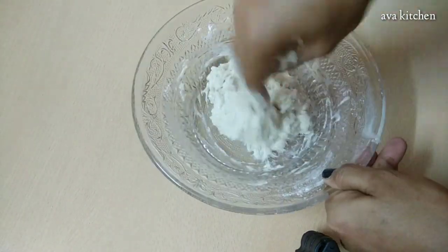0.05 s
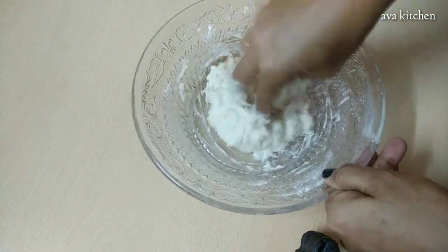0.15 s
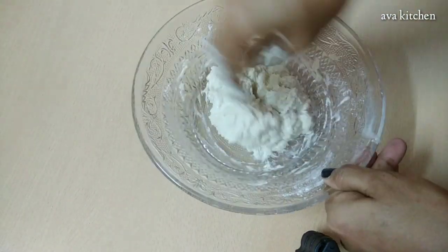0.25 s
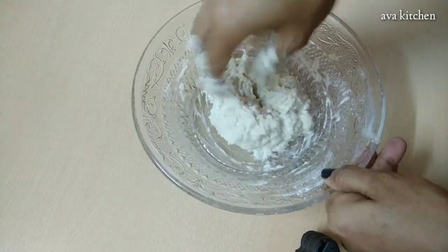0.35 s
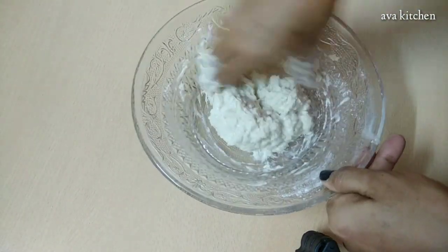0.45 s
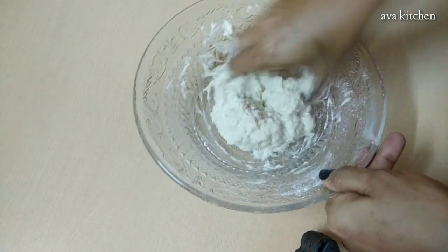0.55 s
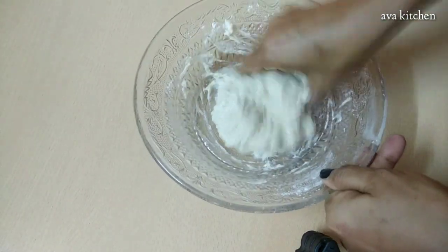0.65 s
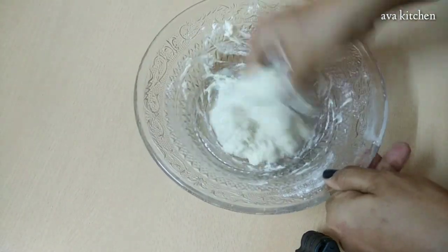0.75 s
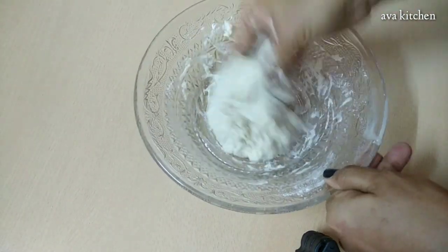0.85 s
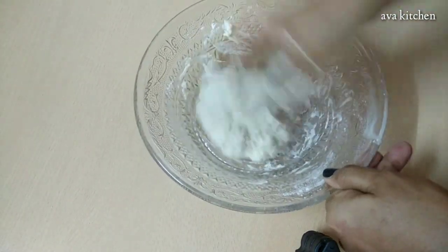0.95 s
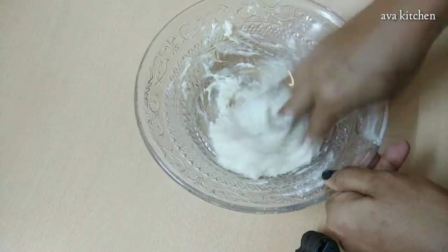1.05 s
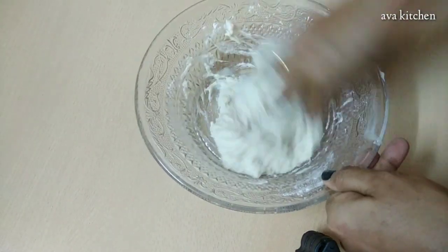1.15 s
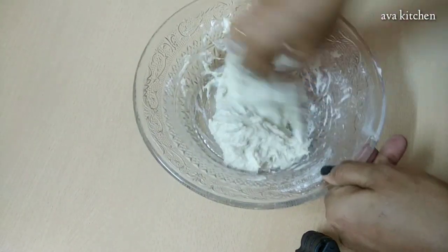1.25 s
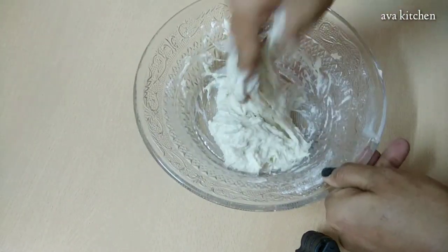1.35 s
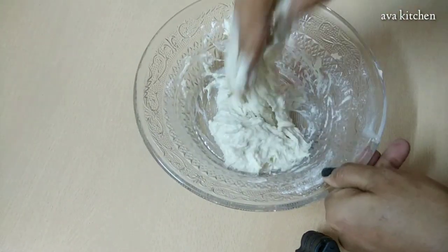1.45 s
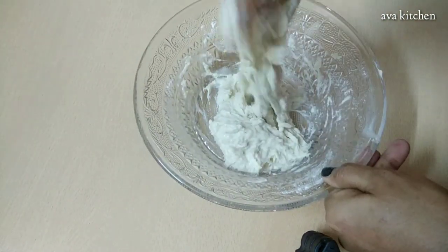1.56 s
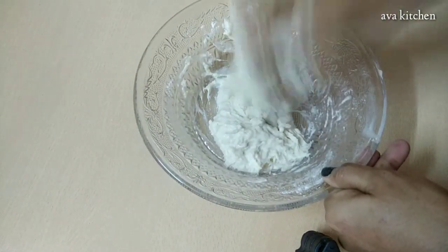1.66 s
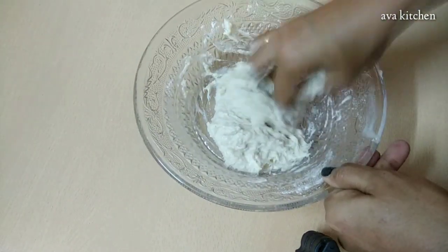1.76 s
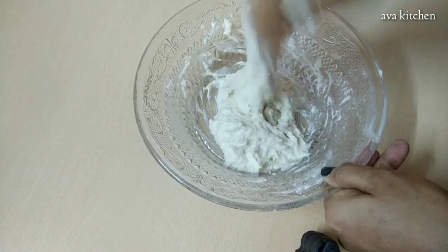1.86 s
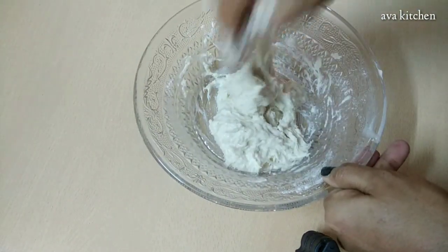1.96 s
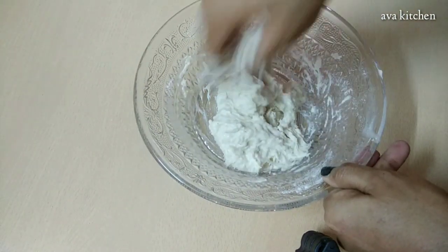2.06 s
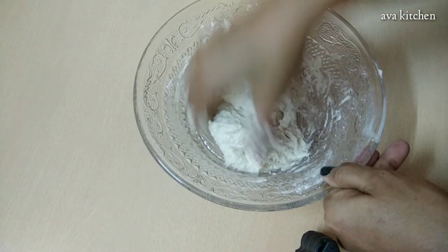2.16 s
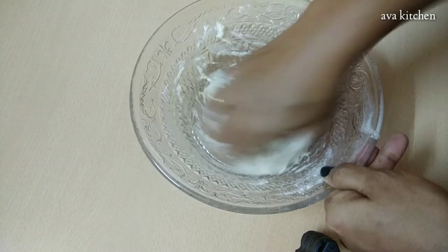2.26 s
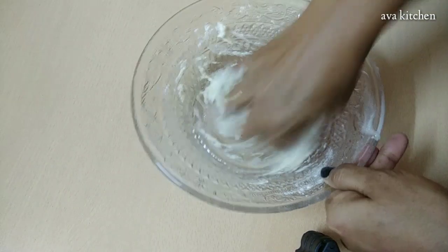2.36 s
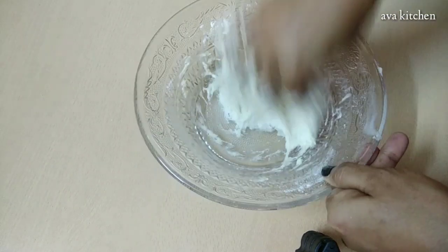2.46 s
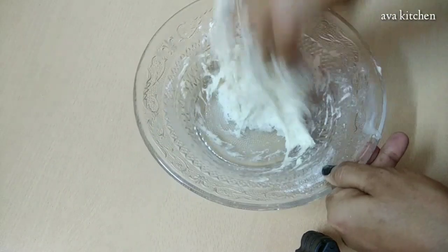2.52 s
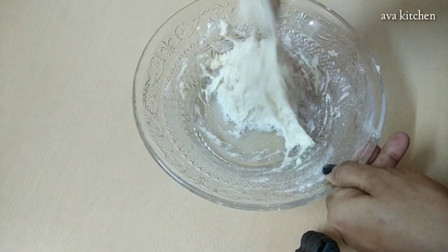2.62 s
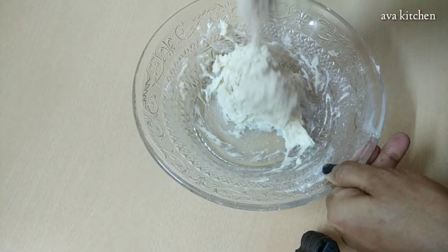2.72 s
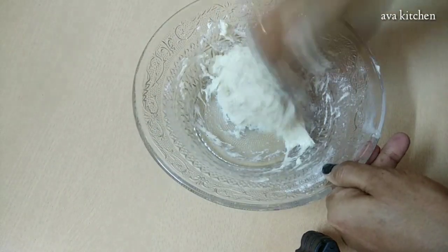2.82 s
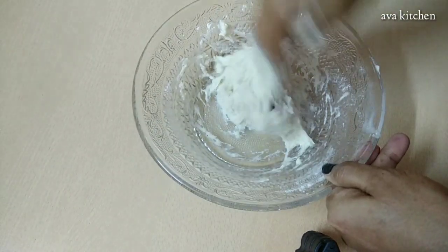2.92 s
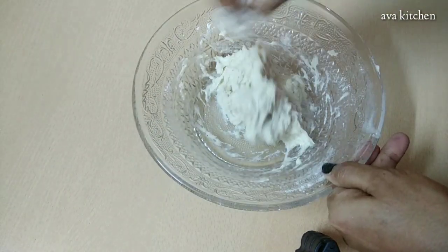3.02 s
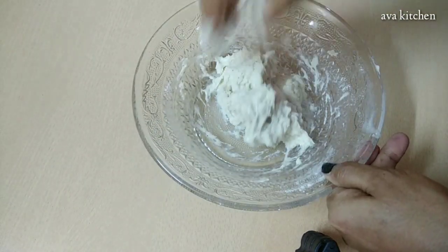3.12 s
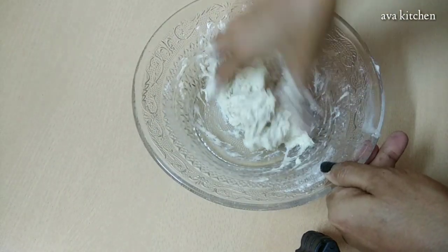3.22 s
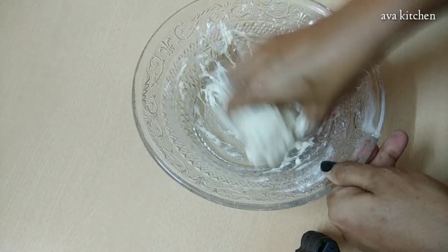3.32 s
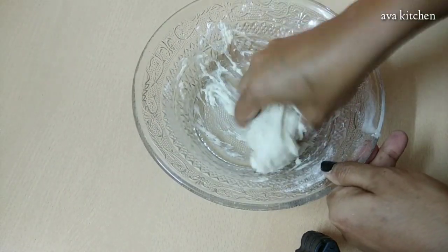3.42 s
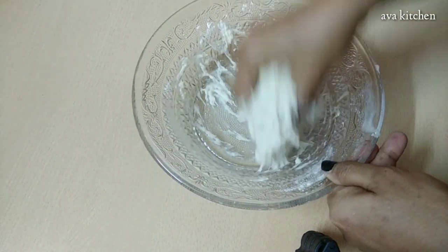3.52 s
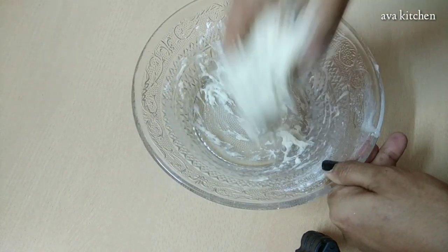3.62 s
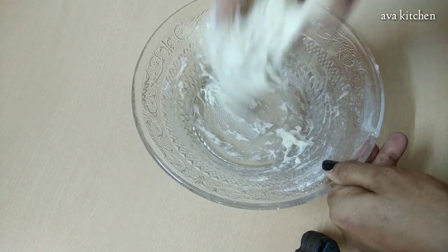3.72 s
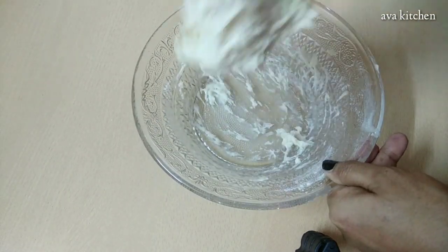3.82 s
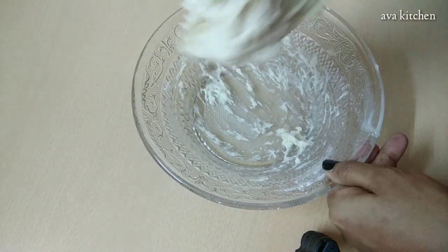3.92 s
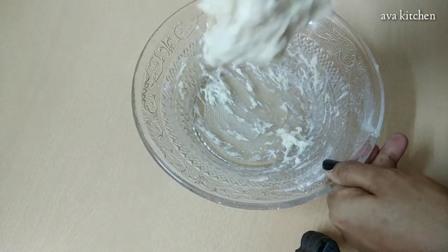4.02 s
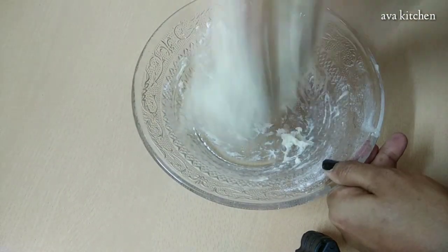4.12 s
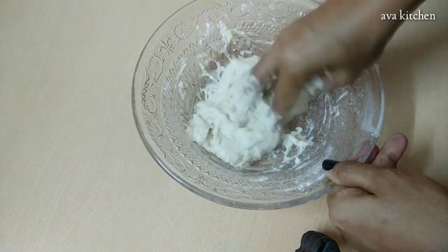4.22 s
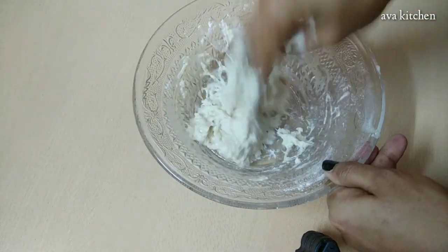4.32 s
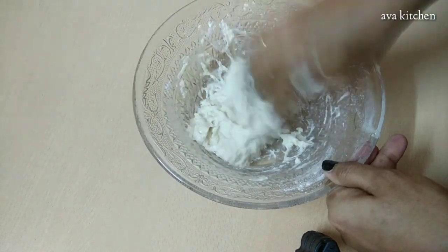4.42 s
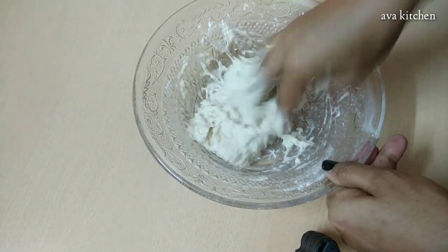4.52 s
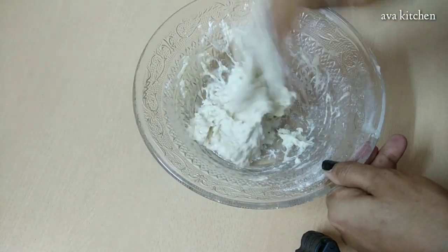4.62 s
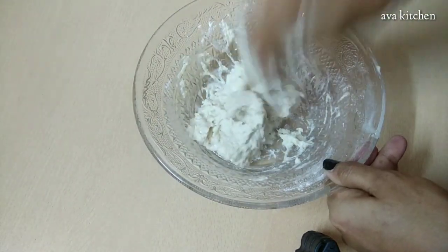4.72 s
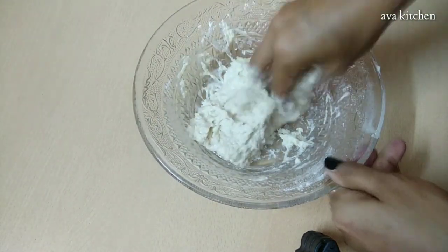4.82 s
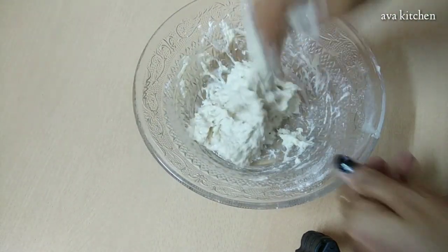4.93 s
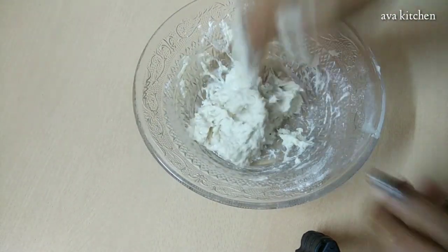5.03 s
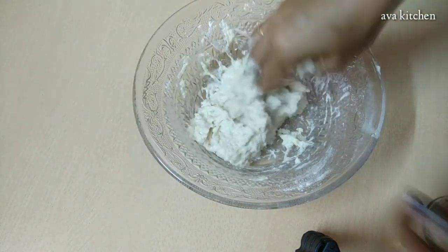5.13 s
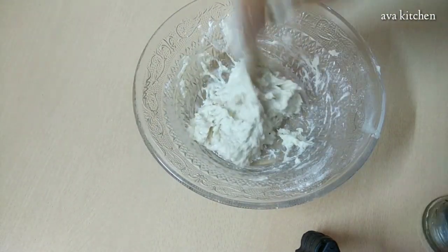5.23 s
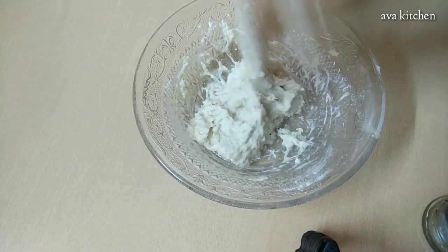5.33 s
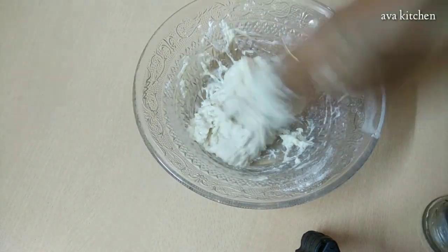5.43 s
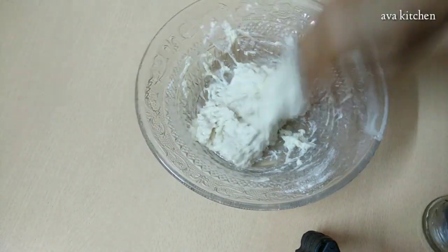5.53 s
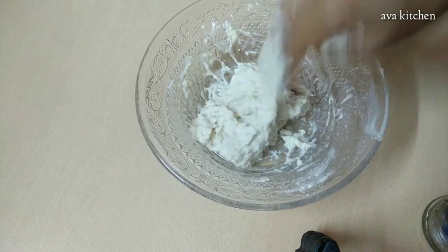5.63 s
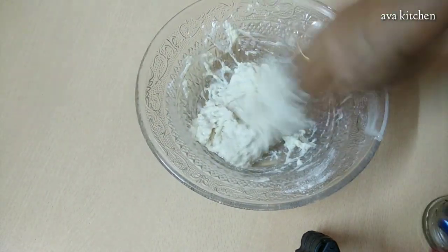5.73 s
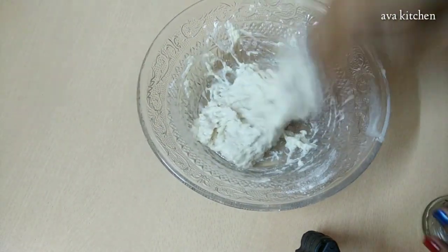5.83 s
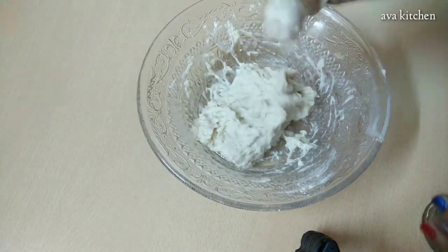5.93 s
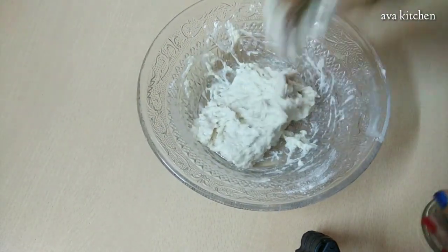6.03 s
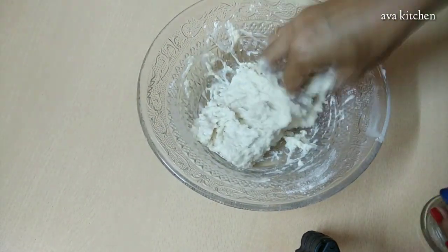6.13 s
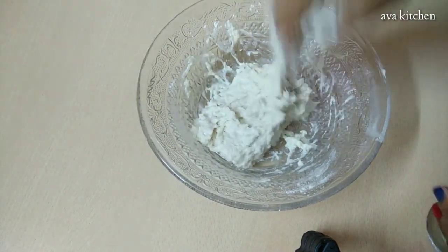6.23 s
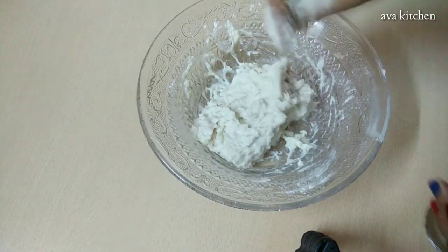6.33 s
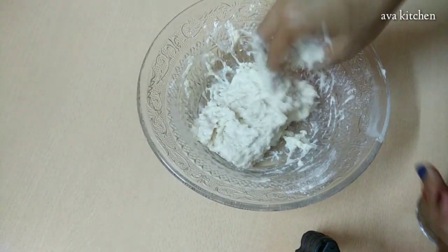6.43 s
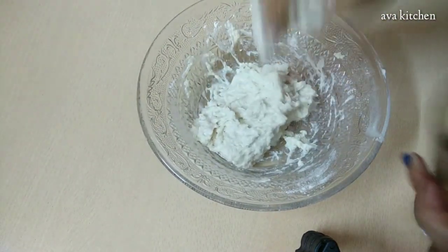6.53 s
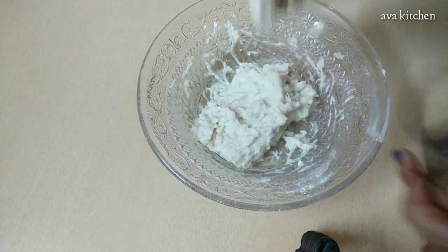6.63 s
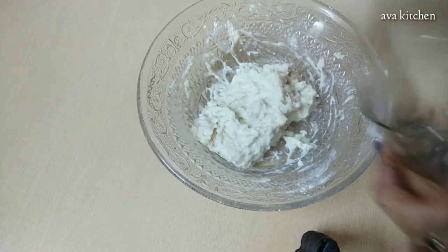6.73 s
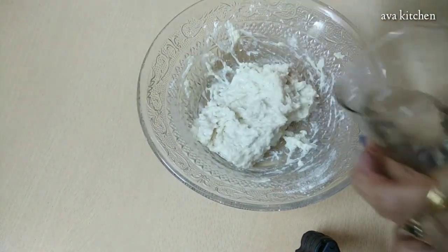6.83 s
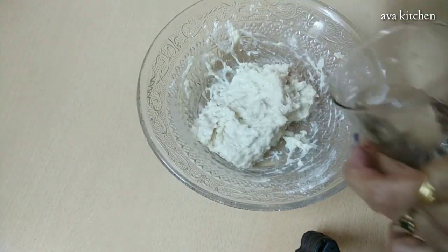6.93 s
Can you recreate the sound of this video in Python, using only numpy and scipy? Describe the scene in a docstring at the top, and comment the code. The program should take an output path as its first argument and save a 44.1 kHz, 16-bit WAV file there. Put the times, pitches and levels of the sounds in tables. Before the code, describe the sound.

Sticky dough squelches and pops close up as fingers press and pull it in a glass bowl. The bowl rocks against a wooden table in a quick cluster of knocks, then again a second later. A single wet slap follows as the dough drops back in, and the crackly kneading continues more lightly. The small, hard-walled kitchen rings a little, and street traffic with one far toot is barely audible.

```python
"""Sticky batter kneaded by hand in a glass bowl, close to a phone's two microphones in a small hard-walled
kitchen. Wet films crackle and air pockets pop as the fingers pull; the pressing palm rumbles through
the wooden table. The bowl scuffs and knocks as it rocks, and once the lifted lump slaps back into it.
Far off in the street, traffic murmurs, a horn toots and a motor pulls away."""
import sys
import numpy as np
from scipy import signal
from scipy.fft import rfft, irfft
from scipy.io import wavfile
from scipy.ndimage import uniform_filter1d

SR = 44100
rng = np.random.default_rng(int(sys.argv[2]) if len(sys.argv) > 2 else 0)


def master_out(mix):
    """Clip the mix to full scale and print it as 16-bit PCM to the path in sys.argv[1]."""
    frames = np.transpose(np.atleast_2d(mix))
    ceiling = np.clip(frames, -1, 1)
    pcm = np.round(ceiling * 32767).astype(np.int16)
    wavfile.write(sys.argv[1], SR, pcm)


N = 307356
TOP_HZ = 15800  # the phone's upper limit


def amp(db):
    """Decibels to gain."""
    return 10 ** (np.asarray(db) / 20)


def unit(x):
    """Scale to rms 1."""
    return x / np.sqrt(np.mean(x ** 2))


def seconds(length):
    """A time axis."""
    return np.arange(int(length * SR)) / SR


def envelope(rows):
    """Gain along rows of (time_s, level_db), silent outside them."""
    return amp(np.interp(np.arange(N) / SR, *np.transpose(rows), left=-140, right=-140))


def gestures(rows, attack_s, fall_db_per_s):
    """Gain of (start_s, hold_s, level_db) rows: each swells up to its start, holds, then dies away."""
    power = np.zeros(N)
    for start, hold, db in rows:
        end = start + hold + 80 / fall_db_per_s
        i = np.arange(max(int((start - attack_s) * SR), 0), min(int(end * SR), N))
        rise = np.clip(1 + (i / SR - start) / attack_s, 0, 1) ** 2
        fall_db = fall_db_per_s * np.maximum(i / SR - start - hold, 0)
        power[i] += (rise * amp(db - fall_db)) ** 2
    return np.sqrt(power)


def add(out, start_s, sound):
    """Mix a sound in at start_s."""
    i = int(start_s * SR)
    out[..., i:i + sound.shape[-1]] += sound[..., :N - i]


def through(x, response):
    """Convolve, channel by channel."""
    return signal.oaconvolve(np.atleast_2d(x), np.atleast_2d(response), axes=1)[:, :N]


def colour(x, points, size=4096):
    """Causal filter through (freq_hz, gain_db) points."""
    hz, db = np.transpose(points)
    gain = amp(np.interp(np.log(np.fft.rfftfreq(size, 1 / SR) + 1), np.log(hz), db))
    cepstrum = irfft(np.log(gain))[:size // 2]
    cepstrum[1:] *= 2
    return through(x, irfft(np.exp(rfft(cepstrum, size))))


def ring(modes, length_s):
    """Impulse response of (pitch_hz, level_db, t60_s) modes."""
    t = seconds(length_s)
    return sum(amp(db) * np.cos(2 * np.pi * hz * t) * np.exp(-np.log(1000) * t / t60)
               for hz, db, t60 in modes)


def slips(per_s, spread_db):
    """Random little jerks of unequal size, rms 1."""
    jerks = (rng.random(N) < per_s / SR) * rng.choice([-1, 1], N)
    return unit(jerks * amp(spread_db * rng.standard_normal(N)))


def wide_noise(spectrum):
    """Coloured noise, partly shared by both microphones, rms 1."""
    return unit(colour(rng.standard_normal((2, N)) + rng.standard_normal(N), spectrum))


def place(x, pan_db, lag_ms):
    """A close source at the two microphones: the left hears it pan_db louder and lag_ms later."""
    delay = np.exp(-2j * np.pi * np.fft.rfftfreq(len(x), 1 / SR) * lag_ms / 1000)
    left = irfft(rfft(x) * delay, len(x))
    return np.array([left * amp(pan_db / 2), x * amp(-pan_db / 2)])


def microphones(pair):
    """The two microphones face different ways and differ in the treble."""
    left = colour(pair[0], [(4000, 2.5), (8000, -3.0), (14000, 1.5)])
    right = colour(pair[1], [(4000, 3.5), (8000, 2.5), (14000, -3.0)])
    return np.vstack([left, right])


# Room tone of the kitchen: freq_hz, gain_db
HUSH_SPECTRUM = [(30, -13), (190, 1), (350, -13.5), (900, -17.5), (2000, -30), (15000, -27.5)]
def room_tone():
    """A faint, low hush all round the microphones."""
    return wide_noise(HUSH_SPECTRUM) * amp(-82.5)


# The street as heard indoors: freq_hz, gain_db
TRAFFIC_SPECTRUM = [(100, -4.5), (470, 2), (680, -12.5), (900, -4.5), (1300, -5), (1800, -10.5), (2500, -7),
                    (3600, -19.5), (9000, -34)]
# Its swells and lulls: time_s, level_db
TRAFFIC_LEVELS = [(0, -60.5), (1.8, -64), (3.4, -61), (3.6, -88.5), (4.0, -68.5), (4.4, -61.5), (5.2, -70),
                  (5.75, -71.5), (6.0, -68.5), (6.5, -79), (6.8, -93.5), (7.0, -92)]
def traffic():
    """Distant traffic comes and goes."""
    return wide_noise(TRAFFIC_SPECTRUM) * envelope(TRAFFIC_LEVELS)


# The horn down the street: time_s, pitch_hz
HORN_GLIDE = [(4.44, 483.5), (4.5, 485), (4.57, 496), (4.63, 487), (4.74, 499), (4.85, 490.4)]
# Its harmonics: multiple, level_db
HORN_HARMONICS = [(1, 5), (2, 2.5), (3, 0), (4, -16)]
def horn():
    """One far toot; echoes between the houses make each harmonic waver on its own."""
    phase = 2 * np.pi * np.cumsum(np.interp(np.arange(N) / SR, *np.transpose(HORN_GLIDE))) / SR
    noise = rng.standard_normal((len(HORN_HARMONICS), N))
    wavers = unit(colour(noise, [(8, -12.5), (25, 0), (100, -61), (400, -82)]))
    tone = sum(amp(db) * np.sin(k * phase + .58 * waver)
               for (k, db), waver in zip(HORN_HARMONICS, wavers))
    return unit(tone) * gestures([(4.54, .022, -52)], attack_s=.15, fall_db_per_s=53.5)


# A motor pulling away outside: time_s, pitch_hz, level_db
MOTOR_RUN = [(6.05, 980, -85), (6.35, 1007, -78), (6.65, 1080, -74.5), (6.78, 1140, -79), (6.87, 1207, -77),
             (6.97, 1264, -82)]
def motor():
    """A rising whine, smeared into a narrow band by its many paths between the houses."""
    times, hz, db = np.transpose(MOTOR_RUN)
    phase = 2 * np.pi * np.cumsum(np.interp(np.arange(N) / SR, times, hz)) / SR
    smear = unit(colour(rng.standard_normal(N), [(70, 2.5), (150, -8), (400, -30.5)]))
    return smear * np.sin(phase) * envelope(list(zip(times, db)))


# Diffuse ring of the kitchen: freq_hz, t60_s, level_db
WALL_TAIL = [(59.3, 0.85, -19.5), (95, .7, -10), (130.8, 0.67, 0), (286.4, 0.54, -6), (812, 0.36, -4),
             (2800, .38, -2.5), (7900, 0.31, -1.5), (15000, 0.28, -4.5)]
# Standing waves between its walls: pitch_hz, relative_db, t60_s
ROOM_MODES = [(120, 3, 0.68), (169, 1, 0.66), (216, -9.5, 0.47), (247.6, 1, 0.35), (326, -6, 0.27),
              (389, -12, 0.2), (412, -6, 0.45), (455, -11.5, 0.2), (545, -6, 0.6), (678, -13.5, .37),
              (694, -14, 0.18)]
def kitchen(x, build_s=.003, modes_db=-58.5, alike_hz=400.8):
    """Bare walls answer with standing waves and a diffuse tail, alike at both microphones in the bass."""
    t = seconds(.9)
    hz, t60s, levels = np.transpose(WALL_TAIL)
    freq = np.fft.rfftfreq(len(t), 1 / SR)
    mid, side = rfft(rng.standard_normal((2, len(t))))
    width = freq / (freq + alike_hz)
    noise = (mid + np.array([[1], [-1]]) * width * side) / np.sqrt(1 + width ** 2)
    tail = 0
    for share, t60, db in zip(np.eye(len(hz)), t60s, levels):
        band = irfft(noise * np.interp(np.log(freq + 1), np.log(hz), share), len(t))
        fade = (1 - np.exp(-(t / build_s) ** 2)) * np.exp(-np.log(1000) * t / t60)
        tail = tail + amp(db) * band * fade / np.linalg.norm(fade)
    waves = ring(ROOM_MODES, 1)[:len(t)] * (1 - np.exp(-t / build_s))
    return through(x, tail + amp(modes_db) * waves)


# Higher modes of bowl and table top: pitch_hz, relative_db, t60_s
BOWL_MODES = [(449, -2.5, 0.014), (734, 0.5, 0.011), (875, -6, 0.011), (890, -14, 0.0064),
              (1360, -9, 0.0081), (1795, -24, 0.033)]
# The bowl rocks on the wood: start_s, relative_db, contact_ms, base_t60_s, rebound_db, rebound_gap_ms
BOWL_KNOCKS = [(0.2544, -30.5, 1.5, .033, -20, 3.9), (0.882, -20.5, 5.3, 0.059, -12, 3),
               (1.045, -26, 1.9, 0.036, -12, 3.9), (1.1698, 1.5, .9, .045, -6.5, 3.23),
               (1.1788, -2, 1.5, .025, -8, 3), (1.1947, -2, 0.85, 0.011, -8.5, 2.2),
               (1.2069, -5.5, 1.03, 0.013, -21, 3.2), (1.221, -8, 0.74, .02, -22, 2.6),
               (1.2531, -7.5, 1.96, 0.018, -12.5, 3.3), (2.1734, -3, 0.91, 0.0087, -10, 2.7),
               (2.1992, -7, 0.94, 0.006, -6, 2.8), (2.232, -10.5, 1.28, 0.011, -12, 3.1),
               (2.3352, -7.5, 0.94, 0.019, -10, 2.83), (2.3516, -16.5, 2.7, 0.029, -9, 3.3),
               (2.363, -17.5, 1.1, 0.015, -10.5, 3.84), (2.7704, -14, 1.08, 0.018, -12, 2.36),
               (2.7738, -14, 1.14, 0.0067, -15, 2.8), (2.7825, -22, 1.25, 0.027, -13, 3.1),
               (2.7858, -20, 1.45, 0.01, -17, 3.2), (2.7904, -20, 1.33, .017, -28, 2.9),
               (4.013, -10.5, 1.08, 0.066, -17, 3.4), (4.1247, -6.5, 1.07, 0.0085, -21, 3.4),
               (4.1302, -17, 2.1, 0.029, -8.5, 2.96), (4.609, -33.5, 0.15, .008, -18, 4),
               (4.61, -24, 3.5, 0.023, -14.5, 3.15), (5.826, -36.5, 0.67, .022, -8, 2.6),
               (5.835, -19.5, 2.74, 0.021, -7, 2.9)]
def knocks(base_hz=327.8, table_delay_hz=700):
    """Each blow is duller the longer it lasts and rebounds twice; the base rings and grit rasps."""
    thuds, grit = np.zeros((2, N))
    ms = 1000 * seconds(.06)
    for start, db, contact_ms, t60, rebound_db, gap_ms in BOWL_KNOCKS:
        push = np.sin(np.pi * np.minimum(ms / contact_ms, 1)) ** 2
        body = ring([(base_hz, 0, t60)] + BOWL_MODES, .2)  # the base rings as long as the hands let it
        blow = amp(db) * signal.fftconvolve(push / push.sum(), body)
        for k in range(3):
            add(thuds, start + k * gap_ms / 1000, amp(k * rebound_db) * blow)
        add(grit, start, amp(db) * rng.standard_normal(len(ms)) * np.exp(-ms / 9))
    # bending waves in the table top deliver the lows a little after the highs
    pole = np.exp(-2 * np.pi * table_delay_hz / SR)
    return signal.lfilter([pole, -1], [1, -pole], -thuds), grit


# The bowl slides on the table: start_s, length_s, relative_db
BOWL_SCUFFS = [(0.347, 0.11, -39), (0.887, 0.059, -42), (0.994, 0.093, -35), (1.996, 0.15, -33.5),
               (5.294, 0.076, -37), (5.595, 0.057, -42), (5.816, 0.05, -40.5)]
def scuffs():
    """The base sticks and slips while the hand drags the bowl, grinding a little grit."""
    grip = np.zeros(N)
    for start, length, db in BOWL_SCUFFS:
        add(grip, start, amp(db) * np.sqrt(np.hanning(int(length * SR))))
    jerks = grip * slips(per_s=1000, spread_db=1)
    force = colour(jerks, [(90, -16.5), (170, -4.5), (400, -2), (850, -.5), (1500, -11), (4000, -30)])
    grind = colour(jerks, [(700, -30), (1700, -3), (2800, -4.5), (3600, -5), (5000, -15), (12000, -22.5)])
    return through(force, ring(BOWL_MODES, .2))[0], grind


def bowl_on_table():
    """The table top radiates knocks and scuffs, with little above its main modes."""
    thuds, grit = knocks()
    drag, grind = scuffs()
    radiation = [(50, -16), (85, -14), (140, -.5), (300, 1), (1250, 1), (1750, -7), (2600, -18.5),
                 (6000, -46)]
    wood = colour(amp(-6.5) * thuds + amp(-25) * drag, radiation)
    rasp = colour(grit, [(300, -18), (1300, 4.5), (2300, -4), (3500, -17), (5000, -22.5), (12000, -23)])
    sound = wood + amp(-23) * rasp + amp(-13) * grind
    return place(sound[0], pan_db=1.5, lag_ms=.018)


def hand_contact(db, hold_s=6.49):
    """Gain of the faint sound the hand makes for as long as it is in the bowl."""
    return gestures([(.0018, hold_s, db)], attack_s=.02, fall_db_per_s=68.5)


# Kneading heard through the table: freq_hz, gain_db
RUMBLE_SPECTRUM = [(24, -61.5), (40, -13), (81, -25), (100, -18), (119, -1), (135, -2.5), (162, 4.5),
                   (194, 1), (230, 3), (275, -7), (349, -7.5), (389, -19.5), (495, -26.5), (700, -21),
                   (910, -41), (1540, -120)]
# The palm bears down: start_s, hold_s, relative_db
PALM_PRESSES = [(0.0, 0.0076, -36), (.285, 0.056, -38.5), (.42, 0.17, -50.5), (.87, 0.15, -49.5),
                (1.03, 0.35, -37.5), (1.52, 0.027, -42), (2.02, 0.1, -38), (2.63, 0.29, -46.5),
                (3.03, 0.086, -45.5), (3.36, 0.17, -55.5), (3.71, 0.31, -52.5), (4.22, 0.28, -51.5),
                (4.61, 0.041, -43), (4.94, 0.039, -53), (5.34, 0.026, -42.5), (5.64, 0.035, -48),
                (5.835, 0.071, -42.5), (6.06, 0.49, -53.5), (6.6, 0.046, -61)]
def palm_rumble():
    """Soft jerks of the batter under the palm shake the table."""
    rumble = unit(colour(slips(per_s=660, spread_db=3), RUMBLE_SPECTRUM))[0]
    presses = gestures(PALM_PRESSES, attack_s=.044, fall_db_per_s=109)
    weight = np.hypot(presses, hand_contact(-63.5))
    return place(rumble * weight * amp(-6), pan_db=0, lag_ms=0)


# The wet slap at close range: freq_hz, gain_db
SLAP_SPECTRUM = [(40, -36), (130, -5.5), (220, -4.5), (330, 4), (450, 3.5), (650, 3), (1020, 2), (1400, -3),
                 (2200, -3.5), (2750, -1), (3260, 0), (3600, -6.5), (4300, -15.5), (5300, -18), (6100, -3),
                 (7000, -8.5), (8800, 2), (11500, 1), (15000, -6)]
# Faint, brief tones in the tail of the wet slap: pitch_hz, relative_db, t60_s
SLAP_TONES = [(1051, -1, .2), (1675, -7, .2), (2950, -1, 0.1), (3235, -1, .16), (8903, -1.5, 0.15),
              (9287, -5.5, .14), (11459, -5.5, .14)]
def lump_slap(start_s=4.0105, hold_s=.0055, attack_s=.0074):
    """The lump lands: air spits from under it, batter spatters, the table thumps; faint tones trail."""
    spit = place(slips(per_s=9000, spread_db=1.5), pan_db=4, lag_ms=.092)
    spit += amp(-1) * np.array([slips(per_s=8400, spread_db=7.5) for _ in range(2)])
    burst = gestures([(start_s, hold_s, -6)], attack_s, fall_db_per_s=5997)
    spatter = gestures([(start_s, hold_s, -28)], attack_s, fall_db_per_s=700.5)
    out = amp(-.1) * colour(spit * np.hypot(burst, spatter), SLAP_SPECTRUM)
    out /= np.std(colour(spit, SLAP_SPECTRUM))
    thump = ring([(117.36, -4, .3), (170, -1, .21), (236.4, 2.5, .2)], .6)
    add(out, start_s + .0035, amp(-26.5) * thump)
    add(out, start_s, amp(-32.5) * ring(SLAP_TONES, .3))
    return microphones(out)


def film_crackle(count=7000, spread_db=2.4, decay_cycles=3.5, max_pan_db=18, max_lag_ms=.156, size=96):
    """Thousands of tiny films snap, each a few cycles at its own pitch and place in the bowl."""
    when, pitch, strength, side, path = rng.random((count, 5)).T[:, :, None]
    hz = 1500 + 15000 * pitch ** 1.2
    height = amp(spread_db * np.minimum(-np.log(1 - strength), 3.8)) * np.sqrt(hz)
    index = (when * (N - size)).astype(int) + np.arange(size)
    pair = []
    for sign, lag_s in ((1, path * max_lag_ms / 1000), (-1, 0)):  # left, right
        cycles = hz * np.maximum(np.arange(size) / SR - lag_s, 0)
        gain = height * amp(sign * max_pan_db * (side - .5))
        snaps = gain * np.sin(2 * np.pi * cycles) * np.exp(-cycles / decay_cycles)
        pair.append(np.bincount(index.ravel(), snaps.ravel(), N))
    return unit(np.array(pair))


# Wet crackle at close range: freq_hz, gain_db
WET_SPECTRUM = [(210, -31.5), (350, -5.5), (398, -4.5), (514, 6), (664, -5), (943, -3.5), (1220, -11),
                (2000, -19), (2750, -15), (3340, -17.5), (7190, -15.5), (11600, -1), (15000, -3),
                (16000, -14.5)]
# The fingers pull the batter apart: start_s, hold_s, relative_db
FINGER_PULLS = [(0.0, 0.13, -48), (0.264, .15, -46), (0.415, .18, -43.5), (0.669, .13, -51.5),
                (0.872, .015, -46.5), (0.953, .14, -43), (1.121, .31, -48.5), (1.518, 0.027, -41.5),
                (1.606, .09, -50), (1.962, .1, -49.5), (2.119, .07, -39.5), (2.271, .16, -51),
                (2.53, .06, -57.5), (2.637, .01, -44.5), (2.718, .08, -48.5), (3.02, .02, -40),
                (3.148, .09, -51.5), (3.299, 0.16, -48), (3.63, .04, -65.5), (3.782, .07, -52.5),
                (3.995, .01, -49), (4.142, .08, -51), (4.269, .27, -52), (4.589, .15, -47.5),
                (4.894, .07, -52.5), (4.98, .06, -48), (5.206, .19, -52), (5.57, .16, -58.5),
                (5.751, .03, -56.5), (5.843, .24, -49), (6.257, .15, -63)]
def squelch(pull, fits_per_s=70, fits_db=5.6):
    """Batter tears from fingers and glass in fits and starts; between pulls it clings to the hand."""
    films = unit(colour(film_crackle(), WET_SPECTRUM))
    knots = np.arange(0, N, SR // fits_per_s)
    fits = np.interp(np.arange(N), knots, rng.standard_normal(len(knots)))
    tearing = np.hypot(pull, hand_contact(-67))
    return microphones(films * tearing * amp(fits_db * fits - 7.5))


def small_pockets(pull, count=80):
    """Rows like LARGE_POCKETS: small ones burst at random during the pulls, a little above the crackle."""
    pulling = np.concatenate([np.arange(int(start * SR), int((start + hold) * SR))
                              for start, hold, _ in FINGER_PULLS])
    share = (np.arange(count) + rng.random(count)) / count
    at = pulling[(share * len(pulling)).astype(int)]
    size, pitch, side, smack = rng.standard_normal((count, 4)).T
    level_db = 20 * np.log10(pull[at]) + 4 + 2.5 * size
    pitch_hz = 12000 * 2 ** (.2 * pitch)
    return list(zip(at / SR, level_db, pitch_hz, 4.5 * side, -18 + 3 * smack))


# Air pockets bursting just below the phone; the smack is batter peeling off the skin:
# start_s, level_db, pitch_hz, left_minus_right_db, smack_db
LARGE_POCKETS = [(.2611, -30.5, 10800, -3.5, -17.5), (.3073, -28.5, 12600, 2, -28),
                 (.3256, -35.5, 11500, 2, -4), (.3772, -31.5, 11000, -6, -15), (.3849, -36.5, 9050, 3, 17),
                 (.4118, -36.5, 13500, 7, -12), (.4164, -33.5, 13600, 3, -9), (.4777, -37.5, 11000, 2, 9),
                 (.4907, -41, 13000, 7, -9), (.5173, -37, 13500, 9, -14), (.5686, -16, 15400, 7, -21),
                 (.5697, -21, 15100, 9, -23), (.5763, -25, 13500, 11, -28), (.5899, -42, 12500, 8, -12),
                 (.5987, -41.5, 14000, 11, -18), (.6067, -41, 14000, 12, -25), (.863, -33, 11400, 3, -23),
                 (.8822, -29, 12000, 1, -18), (.8852, -31, 11500, 1, -16), (.962, -34, 11600, 8, -12),
                 (.9737, -35, 11600, 7, -8), (.9862, -37, 12500, 5, -11), (1.0046, -31, 12800, 15, -18),
                 (1.1464, -34, 13200, 9, -24), (1.3764, -40, 12330, 1, -6), (1.4194, -43, 11500, 8, -12),
                 (1.5274, -28, 11100, -2, -25), (1.5409, -30, 12380, 3.5, -6),
                 (1.5462, -38, 12200, 5.5, -18.5), (1.66, -40, 12860, 11, -11),
                 (1.6795, -33.5, 11300, 0, -17), (1.7011, -33.5, 11750, 1, -24),
                 (2.1153, -37, 9680, -9, -8), (2.133, -31, 10400, -2, -6), (2.149, -34, 11000, -3, -11),
                 (2.1697, -36, 12200, 6, -5), (2.1805, -26, 12500, -2, -4), (2.6356, -35, 13400, -2, -20),
                 (2.6373, -24.5, 13000, 0.5, -18), (2.6394, -34, 13000, 4, -16),
                 (2.7116, -45, 12400, 0, -14), (2.8317, -42, 13000, 7.5, -20), (3.027, -24, 11500, -1, -10),
                 (3.0995, -21.5, 8700, 2, -21), (3.1326, -32, 12930, 14, -21), (3.1925, -40, 12500, 5, -14),
                 (3.2214, -45, 13000, 17, -17), (3.3044, -32.5, 11360, -5.5, -11),
                 (3.3339, -40.5, 10980, -5, 2), (3.3545, -37.5, 10500, 0, -4.5),
                 (3.3729, -31.5, 11800, -2.5, -6.5), (3.4062, -34.5, 12400, 3.5, -22),
                 (3.4137, -30, 12200, 2.5, -13), (3.4245, -28.5, 11870, 2, -11),
                 (3.4268, -35, 11500, 5, -11.5), (3.4535, -40, 12800, 6, -16),
                 (3.5058, -32.5, 10850, 2.5, -29), (3.7534, -36, 13000, 6, -11),
                 (3.8481, -38, 13140, 5.5, -10.5), (4.4541, -37, 13300, 7, -25),
                 (4.4912, -33.5, 13900, 16, -31), (4.5175, -38, 10800, 3, -20),
                 (4.5268, -47, 11140, 2, -22), (4.6, -43.5, 10500, 3, -10), (4.6093, -38, 12100, 8, -15),
                 (4.716, -43.5, 11000, 3.5, 0), (4.912, -45.5, 10000, 4, -12), (5.2223, -34, 11810, 3, -15),
                 (5.292, -34, 10150, -1, -20.5), (5.383, -39.5, 12700, 5.5, -20),
                 (5.6323, -40.5, 13200, 6.5, -22), (5.746, -46, 10500, 1.5, -15),
                 (5.754, -37, 10700, 7, -20), (5.7728, -41, 11800, 9, -18.5),
                 (5.785, -39.5, 11000, 5, -18.5), (5.8855, -43.5, 11100, 2.5, -9),
                 (5.911, -40, 11000, 2, -12), (5.9225, -33, 11770, -2, -12), (5.9927, -32, 11900, 3.5, -15),
                 (6.03, -34.5, 12000, 5, -19), (6.2503, -44, 12240, 10.5, -25),
                 (6.3177, -40.5, 11400, 2, -20), (6.3217, -42, 12500, 3, -17),
                 (6.3428, -35.5, 11370, 0, -19)]
def pops(pull, rise_ms=.33, fall_ms=.9, spray_ms=5, pocket_octaves=.56, smack_hz=5200):
    """A film gives way in a run of snaps, coloured by its pocket and the wider gap under the finger."""
    out = np.zeros((2, N))
    lead_s = .01
    ms = 1000 * (seconds(.06) - lead_s)
    freq = np.fft.rfftfreq(len(ms), 1 / SR) + 1
    spray = amp(-18) * np.exp(np.minimum(2 * ms / spray_ms, -ms / spray_ms))  # droplets fly after
    top_cut = 1 / (1 + (freq / TOP_HZ) ** 40)
    smack = np.exp(-np.log2(freq / smack_hz) ** 2)
    for start, db, hz, pan_db, smack_db in LARGE_POCKETS + small_pockets(pull):
        snaps, drops, sizes = rng.standard_normal((3, len(ms)))
        snaps[int(lead_s * SR)] = 4  # the first tear is the sharpest
        stretch = 1 + amp(db + 11)  # big pockets take longer to tear
        burst = np.exp(np.minimum(ms / rise_ms, -ms / fall_ms) / stretch)
        tear = snaps * burst + drops * amp(2.8 * sizes) * spray
        pocket = np.exp(-(np.log2(freq / hz) / pocket_octaves) ** 2) + amp(smack_db) * smack
        sound = irfft(rfft(tear) * pocket * top_cut, len(ms))
        pair = place(sound, pan_db, lag_ms=.14 * rng.random())  # each lies elsewhere in the bowl
        loudest = np.sqrt(uniform_filter1d(np.mean(pair ** 2, axis=0), size=44).max())
        add(out, max(start - lead_s, 0), pair * amp(db) / loudest)
    return out


def scene():
    """Batter and bowl up close, the street far off, and the kitchen's answer to them."""
    pull = gestures(FINGER_PULLS, attack_s=.02, fall_db_per_s=141.5)
    wet, lump, bowl, rumble = squelch(pull), lump_slap(), bowl_on_table(), palm_rumble()
    street = traffic() + horn() + motor()
    snaps = pops(pull)
    # the open bowl throws the pops straight up at the phone, so less of them reaches the walls
    to_walls = (amp(4.5) * wet + amp(-3) * lump + amp(-4.5) * snaps
                + amp(.55) * bowl + amp(-2.5) * rumble + street)
    return wet + lump + snaps + bowl + rumble + street + kitchen(to_walls) + room_tone()


def record(dry):
    """The phone clips any peak past full scale and cuts the top."""
    top_cut = signal.ellip(8, .2, 70, TOP_HZ, fs=SR, output="sos")
    return signal.sosfilt(top_cut, np.clip(dry, -1, 1))


dry = scene()
out = record(dry)
master_out(out)
```